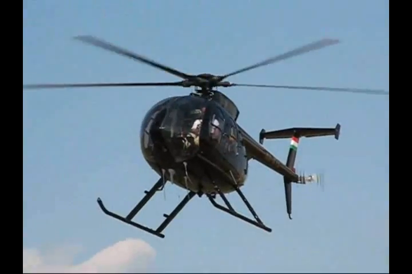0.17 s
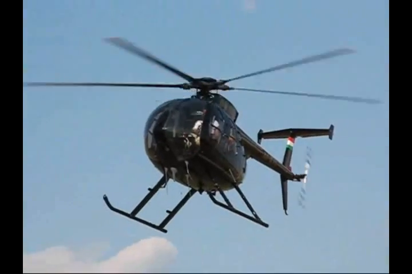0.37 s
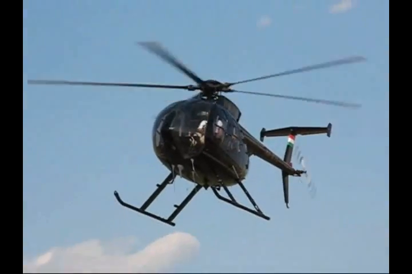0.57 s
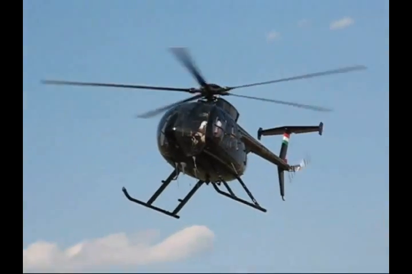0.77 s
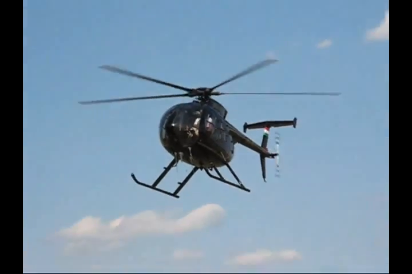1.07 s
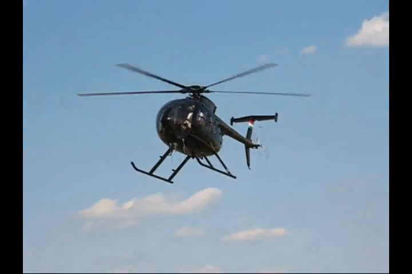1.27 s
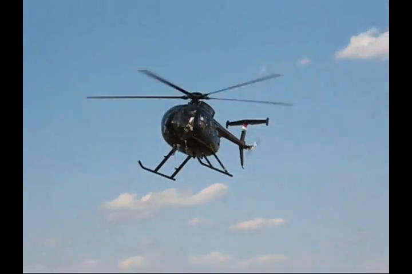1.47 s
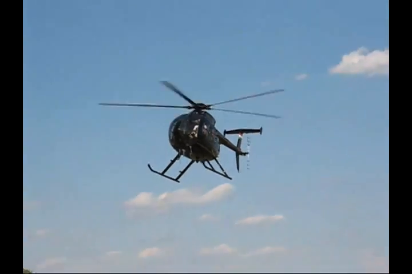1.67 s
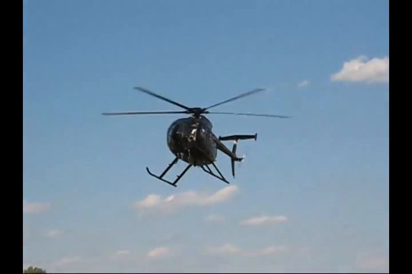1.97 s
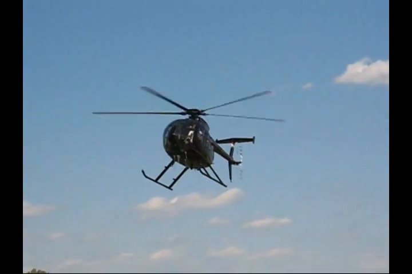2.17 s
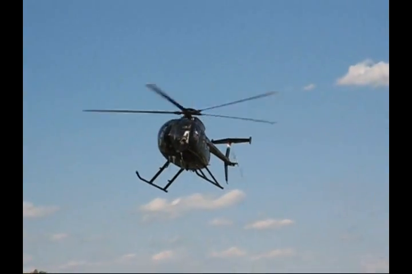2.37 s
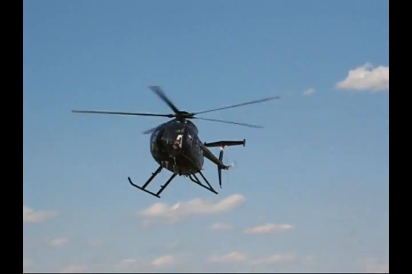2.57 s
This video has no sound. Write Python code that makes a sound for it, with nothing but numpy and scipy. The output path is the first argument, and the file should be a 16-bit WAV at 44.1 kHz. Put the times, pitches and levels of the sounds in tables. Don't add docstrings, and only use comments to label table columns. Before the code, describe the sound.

A hovering light helicopter, rapid sharp blade slaps over a throbbing roar, with wind buffeting the microphone

```python
import sys
import numpy as np
from scipy import signal
from scipy.fft import rfft, irfft
from scipy.io import wavfile
from scipy.ndimage import uniform_filter1d

SR = 44100
rng = np.random.default_rng(int(sys.argv[2]) if len(sys.argv) > 2 else 0)


def voltage_ratio(decibels):
    exponent = np.asarray(decibels, float) / 20
    return 10 ** exponent


def file_out(sig):
    cols = np.atleast_2d(sig).T
    lim = np.clip(cols, -1, 1)
    pcm = np.round(lim * 32767).astype(np.int16)
    wavfile.write(sys.argv[1], SR, pcm)


N = 120834
t = np.arange(N) / SR


def curve(table, col=1):
    rows = np.array(table)
    return np.interp(t, rows[:, 0], rows[:, col])


def unit(x):
    return x / np.sqrt(np.mean(x ** 2))


def walk(rate_hz):
    k = int(SR / rate_hz)
    steps = np.repeat(rng.standard_normal(N // k + 1), k)
    return unit(uniform_filter1d(uniform_filter1d(steps, k), k)[:N])


def colour(x, table, flicker_db, rate_hz):
    hz, db = np.array(table).T
    f = np.maximum(np.arange(N // 2 + 1) * SR / N, 1)
    spec = rfft(x) * voltage_ratio(np.interp(np.log(f), np.log(hz), db))
    place = 2 * np.log2(np.clip(f, 32, 11000) / 32)
    out = np.zeros(N)
    for k in range(18):
        band = irfft(spec * np.clip(1 - abs(place - k), 0, 1), N)
        out += band * voltage_ratio(flicker_db * walk(rate_hz))
    return unit(out)


def dip(x, hz, width_hz, share):
    return x - np.clip(share, 0, 1) * signal.lfilter(*signal.iirpeak(hz, hz / width_hz, fs=SR), x)


# time in seconds, extra travel time in ms.
DRIFT = [
    (0, 1.1),
    (.45, -.1),
    (1.05, -1.3),
    (1.4, -2.25),
    (1.65, -2.3),
    (1.95, -1.2),
    (2.25, .2),
    (2.74, 2.6),
]


def beats(hz, start_s):
    beat = np.arange(-1, int(N / SR * hz) + 1) / hz + start_s
    return beat + np.interp(beat, *np.array(DRIFT).T) / 1000


def turns(hz, start_s):
    return (t - start_s - curve(DRIFT) / 1000) * hz


def chop(hz, start_s, depth_db):
    width_passes = 0.16
    p = turns(hz, start_s)
    swell = np.exp(-((p - np.round(p)) / width_passes) ** 2 / 2)
    return voltage_ratio(depth_db * swell * (2 + 0.3 * walk(40.15)))


CRACK_EDGES_HZ = [690, 12000]


def cracks(beat_s, level_db, spread_ms, ring_hz, octaves, cycles, scatter_db, count):
    ring_stretch = 2.5
    each = rng.standard_normal((len(beat_s), count, 4))
    shared = rng.standard_normal((len(beat_s), 1, 3))
    at_s = (beat_s[:, None] + spread_ms / 1000 * (each[..., 0] + 0.5 * shared[..., 0])).ravel()
    bend = np.tanh(0.54 * each[..., 1] + 0.2 * shared[..., 1])
    f = (ring_hz * 2 ** (octaves * bend)).ravel()[:, None]
    scatter = 2 * scatter_db * np.tanh(0.5 * each[..., 2] + 0.5 * shared[..., 2])
    size = voltage_ratio(level_db + scatter).ravel()[:, None]
    u = np.arange(-128, 128) / SR
    shape = np.exp(-(np.where(u > 0, u / ring_stretch, u) * f / cycles) ** 2 * 4)
    grain = size * shape * np.cos(2 * np.pi * f * u + 2 * each[..., 3].ravel()[:, None])
    out = np.zeros(N + 4000)
    np.add.at(out, (at_s * SR).astype(int)[:, None] + np.arange(256) + 2000 - 128, grain)
    band = signal.butter(2, CRACK_EDGES_HZ, "band", fs=SR, output="sos")
    return unit(signal.sosfilt(band, out)[2000:N + 2000])


def hush(times_s):
    width_ms, share = 1.3, 0.6
    gain = [1 - share * np.exp(-((t[::16] - s) * 1000 / width_ms) ** 2) for s in times_s]
    return np.prod(gain, axis=0).repeat(16)[:N]


HARD_SPREAD_MS, HARD_OCT, HARD_SCATTER_DB = 0.1, 0.05, 0.3
# time in seconds, slap level in dB, roar level in dB.
LOAD = [(0, -16.5, -27), (.3, -23, -25), (.5, -18.5, -25), (.7, -13, -25), (.95, -15.5, -25),
        (1.2, -22, -25), (1.4, -23.5, -22.5), (1.55, -29, -23.5), (1.65, -28, -23.5), (1.8, -33, -22),
        (1.9, -26, -24), (2.07, -21, -22), (2.2, -14, -23.5), (2.3, -12, -23), (2.45, -18, -20),
        (2.6, -27, -21.5), (2.74, -36, -20.5)]
# time in seconds, peak in dB, centre in Hz.
HARD = [(0.0323, -4, 1400), (0.0783, -3.5, 1400), (0.1482, -2.5, 1650), (0.173, 3.5, 2000),
        (0.197, -1, 1560), (0.2439, -4, 1720), (0.2698, 1, 1360), (0.3173, 1, 1220), (0.3643, -5.5, 1490),
        (0.4348, 1, 1600), (0.4819, 0.5, 2000), (0.5566, -1, 1640), (0.581, -1.0, 1800), (0.6052, -2, 1910),
        (0.654, 0, 1460), (0.677, -1, 1400), (0.7006, 2.2, 1350), (0.75, -2.5, 1220), (0.774, 1.5, 1400),
        (0.797, -1, 1860), (0.8206, 1, 1520), (0.8449, 1.5, 2000), (0.894, 1, 1280), (0.9162, -1, 1510),
        (0.9402, 2.5, 1880), (0.9892, -1.7, 2050), (1.0127, 0, 2030), (1.0585, -6, 1950), (1.086, 2, 1860),
        (1.1818, -1.5, 1500), (1.209, 2, 2140), (1.2288, 2, 1830), (1.3015, -1, 1150), (1.3742, -7, 1300),
        (1.4473, -1, 1260), (1.4719, 0.5, 1440), (1.542, -1, 1830), (1.611, 0, 1840), (1.6628, -3, 2100),
        (1.7327, 6.5, 2170), (1.7841, 16, 2170), (1.8025, 4, 1890), (1.8326, -1.5, 1680),
        (1.9044, -6, 1370), (1.9273, -0.5, 1520), (1.953, -2, 1230), (1.977, 5, 1680), (2.0233, 1.5, 1290),
        (2.0473, 13, 1840), (2.097, 6.5, 1190), (2.168, 2.5, 1740), (2.2177, -9, 1750),
        (2.2402, -3.5, 1180), (2.289, 7.5, 1820), (2.315, -4, 1800), (2.4101, -3.5, 1700),
        (2.5071, 2.5, 2300), (2.5782, -3, 1570), (2.6259, 8, 2440), (2.722, 3, 1870)]
# frequency in Hz, density in dB per Hz.
ROAR = [(25, -21), (100, -2), (300, -10.5), (700, -7.5), (1100, -3.5), (2200, -4.5), (4000, -9.5),
        (9000, -34.5)]


def main_rotor():
    pass_hz, start_s = 41.585, 0.0043
    s, db, hz = np.array(HARD).T
    slaps = cracks(beats(pass_hz, start_s), 0, spread_ms=1.3, ring_hz=2100, octaves=0.8, cycles=0.7,
                   scatter_db=1.4, count=5)
    hard_late_ms = -0.21
    hard = cracks(s + hard_late_ms / 1000, db[:, None], HARD_SPREAD_MS, hz[:, None], HARD_OCT,
                  cycles=0.75, scatter_db=HARD_SCATTER_DB, count=1)
    roar = colour(rng.standard_normal(N), ROAR, flicker_db=0.5, rate_hz=15)
    throb = unit(roar * chop(pass_hz, start_s, depth_db=4.0))
    slaps = slaps * hush(s) * voltage_ratio(curve(LOAD) - 12)
    return slaps + hard * voltage_ratio(-24.3) + throb * voltage_ratio(curve(LOAD, col=2))


TAIL_HZ, TAIL_START_S = 99.3, 0.0022
# multiple of the blade rate, level in dB rms.
HUM = [(1, -45.5), (2, -42), (3, -40.5), (4, -37.5), (5, -40.5), (6, -50), (7, -55)]
# time in seconds, peak in dB, centre in Hz.
SNAPS = [(0.0335, 4.5, 3380), (0.1539, 0, 3440), (0.1738, -3, 3500), (0.243, -0.5, 3580),
         (0.2946, -2.5, 3980), (0.3158, -8, 3640), (0.4148, 0, 3600), (0.557, -7, 3540), (0.5812, 2, 3240),
         (0.6565, -4, 3510), (0.667, -2, 3880), (0.7057, -5, 4000), (0.7468, -7, 5100), (0.7561, -8, 4340),
         (0.8674, 6, 3500), (0.8769, -6.5, 3640), (0.8979, 4, 3270), (0.9891, -1, 3280),
         (1.0177, 0.3, 3630), (1.038, 0, 3530), (1.0882, 1, 3340), (1.208, -1.5, 3440), (1.6053, 5, 6310),
         (1.6251, -3, 6060), (1.6473, 6, 5070), (1.661, 4, 3400), (1.7114, -9, 3430), (1.7824, -9, 3420),
         (1.833, -13, 3340), (1.908, 0.5, 6650), (1.9566, -3.2, 4220), (2.0463, -2, 4750),
         (2.098, -9, 4510), (2.118, -1, 3720), (2.219, -2, 4650), (2.2393, -1.3, 4240), (2.4113, -11, 4770),
         (2.4635, -1.7, 3950), (2.6254, -10, 3360), (2.674, 3, 3480)]
# time in seconds, hiss level in dB, tick level in dB.
JET = [(0, -31.5, -39), (.1, -34.5, -26), (.45, -35.5, -30), (.65, -30, -18), (.78, -35, -33),
       (.86, -30.5, -23), (1.0, -30.5, -27.5), (1.25, -31, -24), (1.5, -29, -27.5), (1.65, -23, -17.5),
       (1.8, -30, -25), (1.95, -29.5, -25), (2.07, -22.5, -24), (2.15, -27.5, -29), (2.27, -24.5, -22),
       (2.4, -23.5, -21), (2.55, -28.5, -23.5), (2.7, -22.5, -33)]


def tail_rotor():
    hum_start_s, rise_db_per_s, sway_db = 0.0031, 1.1, 0.5
    phase = 2 * np.pi * turns(TAIL_HZ, hum_start_s)
    hum = np.zeros(N)
    for k, db in HUM:
        level_db = db + rise_db_per_s * (t - 1.5) + sway_db * walk(5.5)
        hum += 2 ** 0.5 * voltage_ratio(level_db) * np.sin(k * phase)
    ticks = cracks(beats(TAIL_HZ, TAIL_START_S), 0, spread_ms=0.9, ring_hz=2900, octaves=0.45, cycles=0.8,
                   scatter_db=1.8, count=3)
    s, db, hz = np.array(SNAPS).T
    snaps = cracks(s, db[:, None], HARD_SPREAD_MS, hz[:, None], HARD_OCT,
                   cycles=0.9, scatter_db=HARD_SCATTER_DB, count=1)
    hushed = hush(np.append(s, np.array(HARD)[:, 0]))
    return hum + snaps * voltage_ratio(-31.5) + ticks * hushed * voltage_ratio(curve(JET, col=2) - 3.5)


# frequency in Hz, density in dB per Hz.
HISS = [(1500, -4.5), (2500, 0.5), (4000, -6.5), (6300, 0.5), (8000, -7.5), (10000, -10.5), (11300, -17),
        (12300, -53)]


def turbine():
    hiss = colour(rng.standard_normal(N), HISS, flicker_db=1.3, rate_hz=16)
    return unit(hiss * chop(TAIL_HZ, TAIL_START_S, depth_db=3.5)) * voltage_ratio(curve(JET))


# frequency in Hz, density in dB per Hz.
SPILL = [(40, 0), (300, -5), (1100, -22), (2000, -6.5), (3200, -10), (4500, -27), (8000, -22),
         (11000, -30.5)]


def diffuse_roar():
    noise = colour(rng.standard_normal(N), SPILL, flicker_db=1.6, rate_hz=10)
    return noise * voltage_ratio(curve(LOAD, col=2) - 9.5)


def wind(level_db, table):
    eddies = rng.standard_normal(N) * voltage_ratio(3.07 * walk(150))
    return colour(eddies, table, flicker_db=1.6, rate_hz=25) * voltage_ratio(level_db)


def lumps(table):
    noise = rng.standard_normal(N)
    out = np.zeros(N)
    for s, db, hz, ms in table:
        b, a = signal.iirpeak(hz, 1.3, fs=SR)
        rumble = unit(signal.lfilter(b, a, signal.lfilter(b, a, noise)))
        out += voltage_ratio(db) * np.exp(-((t - s) * 1000 / ms) ** 2) * rumble
    return out


# time in seconds, level in dB.
GUST_L = [(0, -32), (.35, -38), (.46, -22.5), (.58, -29.5), (.96, -25.5), (1.01, -18), (1.17, -25.5),
          (1.22, -27.5), (1.44, -13.5), (1.58, -36), (1.69, -18.5), (1.83, -11.5), (1.91, -26.5),
          (2.0, -20.5), (2.27, -18.5), (2.33, -34), (2.47, -25), (2.56, -45)]
# frequency in Hz, density in dB per Hz.
WIND_L = [(20, -3.5), (50, -15), (120, -7), (250, -1), (450, -8.5), (700, -11.5), (1000, -14), (2000, -58)]
# time in seconds, level in dB, centre in Hz, length in ms.
LUMPS_L = [(.15, -29, 148, 23), (.4, -25.5, 126, 44), (.47, -26.5, 376, 47), (1.022, -10.5, 257, 13.4),
           (1.09, -15.5, 178, 15), (1.13, -16, 286, 16), (1.17, -17.5, 198, 16), (1.21, -26, 50, 29),
           (1.29, -21.5, 92, 31), (1.36, -17.5, 150, 12), (1.43, -14.5, 357, 29), (1.699, -17.5, 177, 19),
           (1.78, -20, 325, 45), (1.83, -19, 218, 18), (1.998, -11.5, 248, 17), (2.17, -18, 387, 43),
           (2.419, -21, 122, 27), (2.48, -14.5, 164, 11.5)]


def left_wind():
    return wind(curve(GUST_L) - 3.0, WIND_L) + lumps(LUMPS_L)


# time in seconds, level in dB.
GUST_R = [(0, -42), (.35, -46), (.45, -36), (.6, -45), (.95, -48), (1.13, -30), (1.2, -36), (1.38, -33),
          (1.46, -38), (1.55, -39), (1.82, -33), (1.9, -33), (1.96, -29), (2.05, -37), (2.35, -39),
          (2.43, -39), (2.55, -39), (2.74, -38)]
# frequency in Hz, density in dB per Hz.
WIND_R = [(20, -12), (50, -4), (120, 0), (200, -2), (300, -10), (500, -22), (1000, -60)]
# time in seconds, level in dB, centre in Hz, length in ms.
LUMPS_R = [
    (1.13, -23, 170, 30),
    (1.46, -24, 170, 16),
    (1.7, -26, 100, 20),
    (1.82, -25, 140, 40),
    (1.96, -24, 80, 20),
    (2.42, -32, 190, 15),
]


def right_wind():
    return wind(curve(GUST_R), WIND_R) + lumps(LUMPS_R)


def scene():
    craft = main_rotor() + tail_rotor() + turbine()
    craft = dip(craft, hz=820, width_hz=39, share=0.36)
    diffuse = diffuse_roar()
    left = dip(craft, hz=3150, width_hz=1900, share=0.66)
    return np.array([left + diffuse + left_wind(), craft - diffuse + right_wind()])


def band_limit(x):
    return signal.sosfilt(signal.butter(12, 12430, fs=SR, output="sos"), x)


def record(dry):
    cut = signal.lfilter(*signal.butter(1, 18, "high", fs=SR), dry)
    mix = np.tanh(1.121 * cut) / 1.071
    return band_limit(mix)


dry = scene()
out = record(dry)
file_out(out)
```